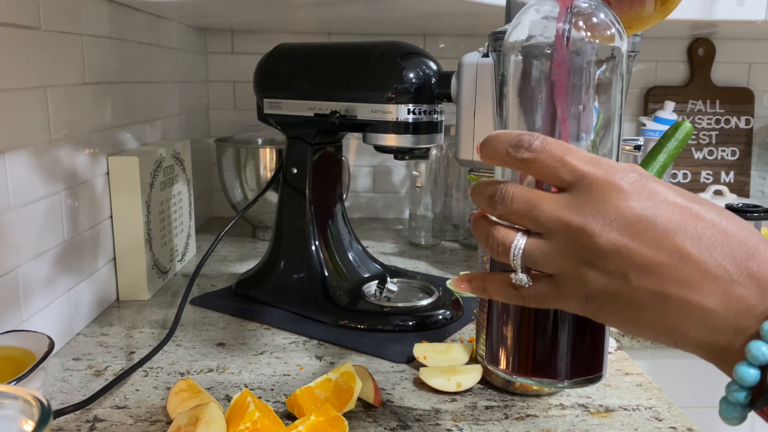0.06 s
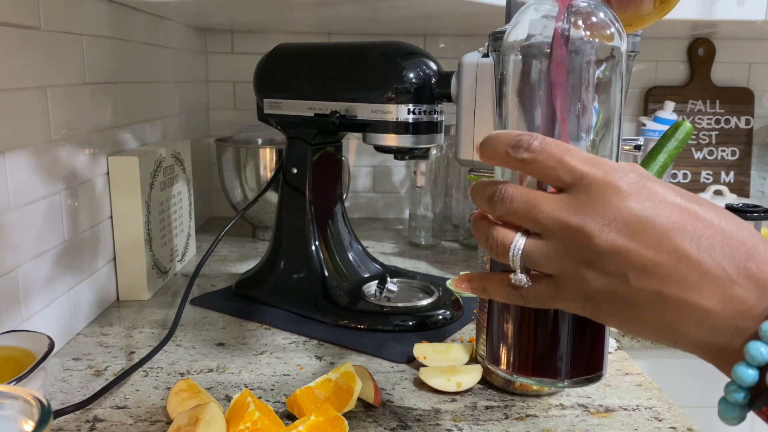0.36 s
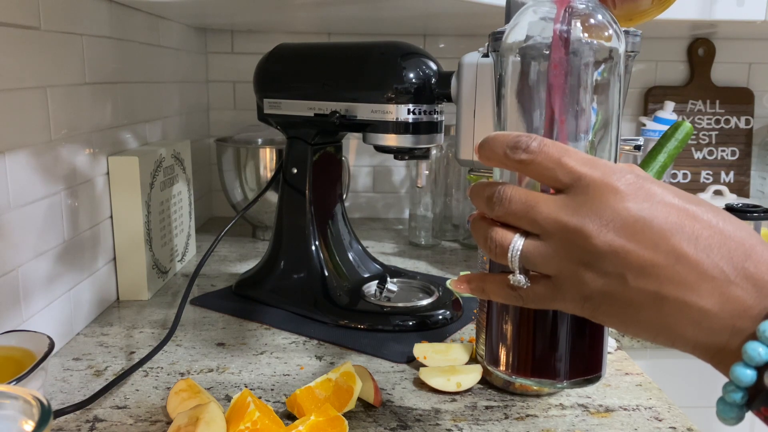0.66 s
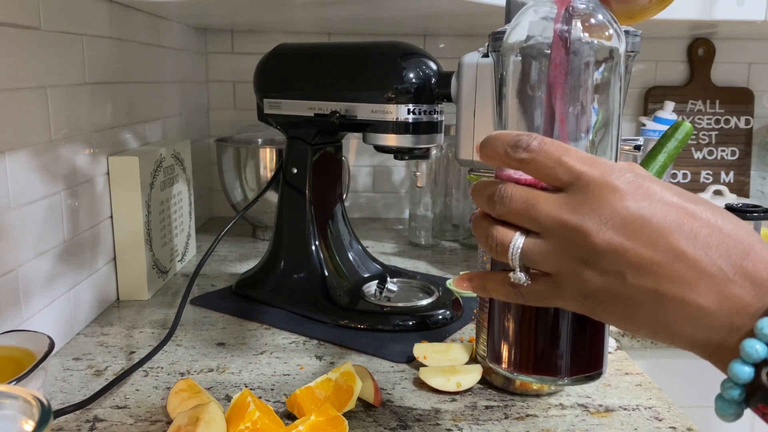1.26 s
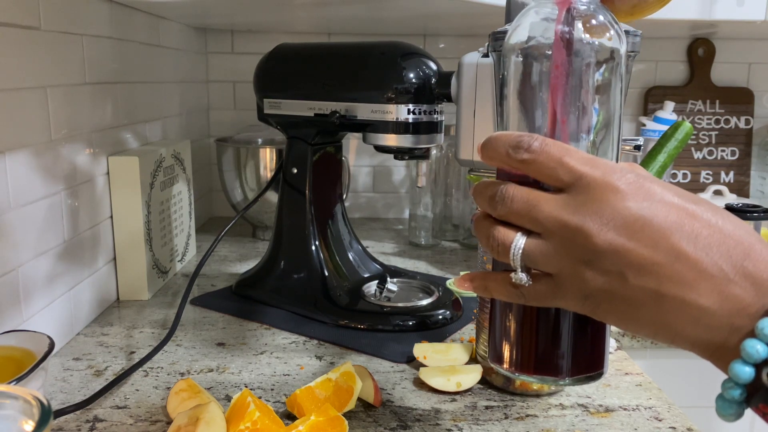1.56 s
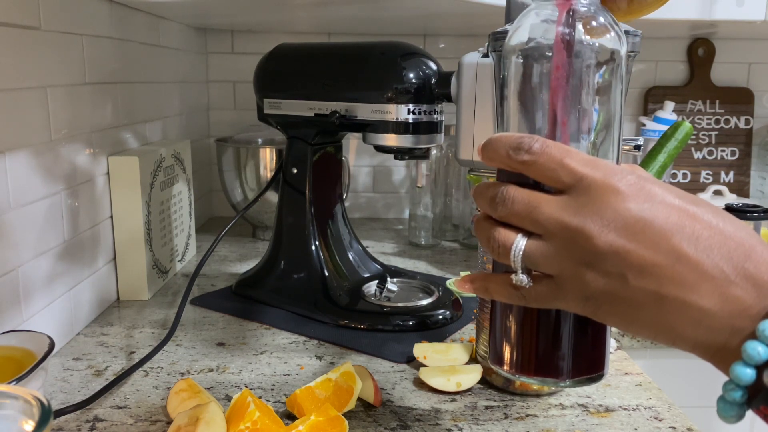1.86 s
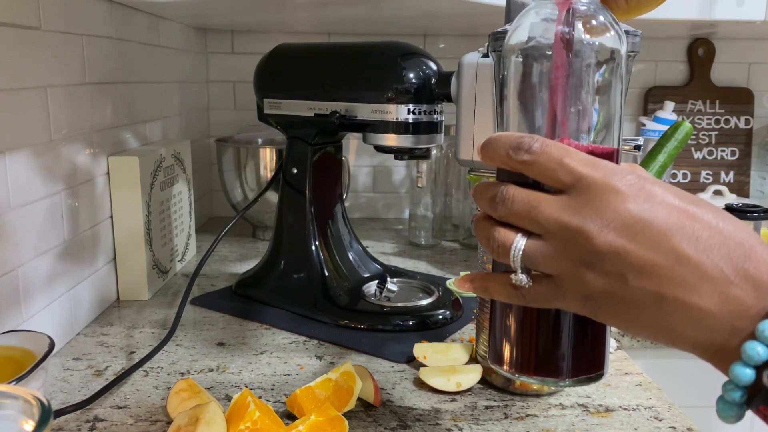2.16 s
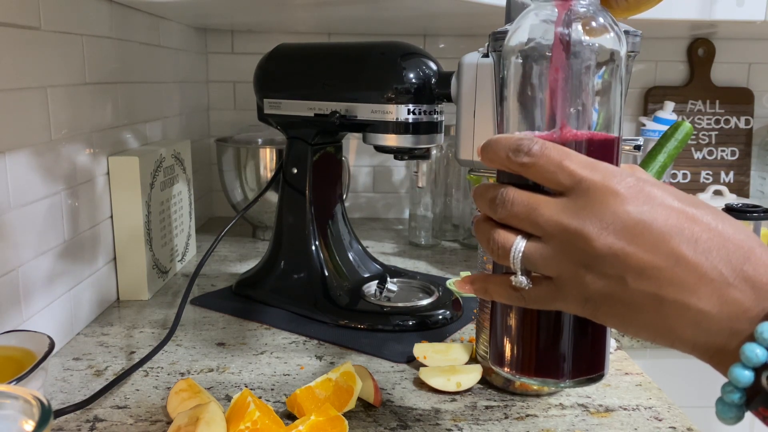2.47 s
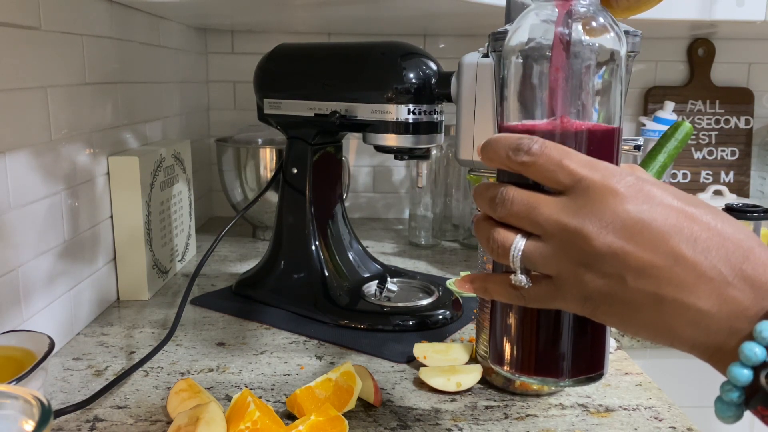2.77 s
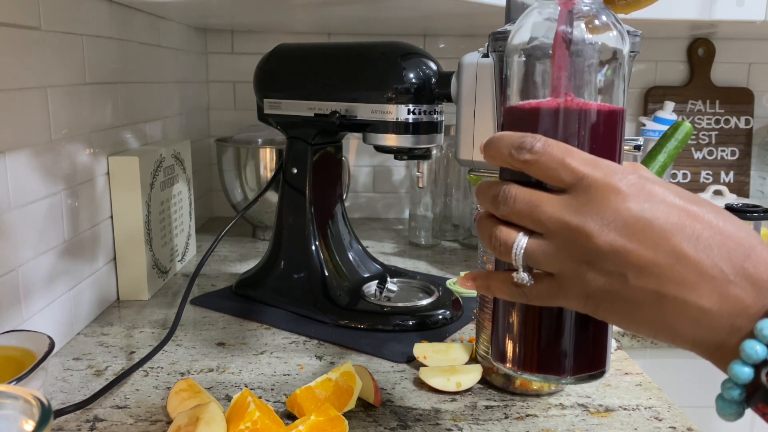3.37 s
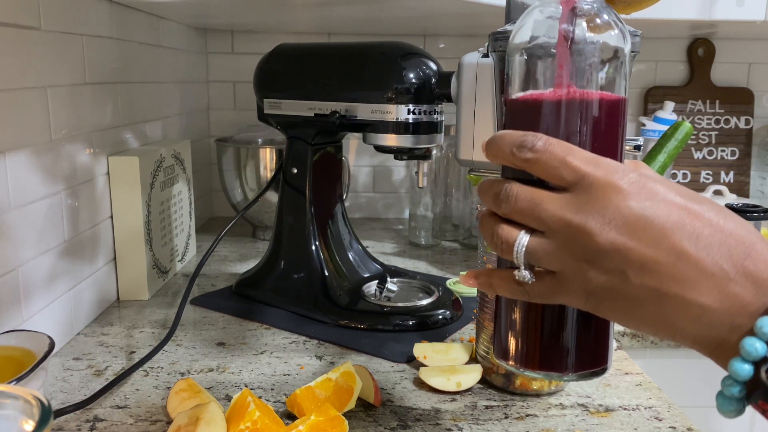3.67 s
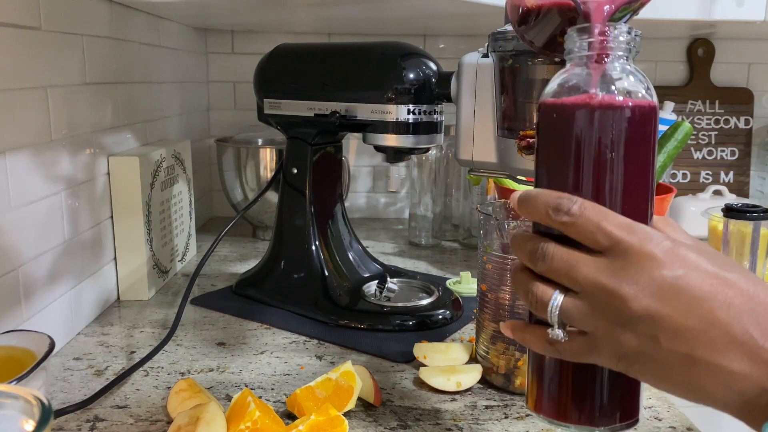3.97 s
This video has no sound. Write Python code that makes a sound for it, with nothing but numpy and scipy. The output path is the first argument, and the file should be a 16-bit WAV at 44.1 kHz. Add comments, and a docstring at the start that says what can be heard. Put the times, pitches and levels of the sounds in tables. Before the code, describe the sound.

A thin stream of juice fills a glass bottle with foamy hiss and a brief knock.

```python
'''A glass bottle on a kitchen counter, the microphone close in front, the sound nearly mono.
From the start a thin stream of juice runs in: foam fizzes and, for the first second or so, larger
bubbles burst. As the bottle fills, the air above the juice rings higher and fainter, and low glugs and
dull bumps come in. Halfway the bottle is knocked once; a sharp tick on the left and a soft bump follow.
The pour runs on and eases a little towards the end.'''
import sys
import numpy as np
from scipy import signal
from scipy.fft import rfft, irfft
from scipy.io import wavfile

SR = 44100
rng = np.random.default_rng(int(sys.argv[2]) if len(sys.argv) > 2 else 0)


def log_audio(samples):
    """Write samples as a 16-bit WAV file to the path given in sys.argv[1]."""
    # one column per channel
    frames = np.atleast_2d(samples).T
    # limit to full scale, then quantise
    limited = np.clip(frames, -1, 1)
    pcm = np.round(limited * 32767).astype(np.int16)
    wavfile.write(sys.argv[1], SR, pcm)


N = 176400

# Levels in the tables are relative; t60 is the time a ring takes to fall by 60 dB.
# spectrum of a faint low noise: f/Hz, level/dB
LOW_NOISE_SPECTRUM = [(20, -9), (55, 3), (150, 0.5), (400, -1.5), (700, -4), (900, -17), (1200, -51),
                      (15000, -46)]
# dull bumps: t/s, level/dB, starting f/Hz
BUMPS = [(1.622, -45, 900), (1.989, -52, 428), (2.391, -43, 650)]
# two low modes of the knocked bottle: f/Hz, level/dB, t60/s
BOTTLE_MODES = [(254, 1, .135), (224, -11, .12)]
# brief higher modes of its glass: f/Hz, level/dB, t60/s
GLASS_MODES = [(965, -24, .05), (1215, -14.5, .025)]
# strength of the churning under the stream: t/s, level/dB
CHURN_LEVEL = [(0, -63), (.3, -69.5), (.5, -64.5), (.85, -63.5), (1.1, -68.5), (1.6, -63), (1.75, -71.5),
               (1.95, -63.5), (2.25, -70.5), (2.45, -68), (3, -71.5), (4, -73)]
# spectrum of the churning: f/Hz, level/dB
CHURN_SPECTRUM = [(20, -23), (38, -14), (56, 1.5), (75, 0.5), (110, 0), (190, -4), (300, -3), (600, -14),
                  (1500, -31)]
# air pockets under the stream: t/s, level/dB, f/Hz
GLUGS = [(1.245, -50, 60), (1.372, -54, 169), (1.467, -46, 302), (1.542, -49, 307), (1.589, -52, 105),
         (1.912, -45, 295), (1.965, -56, 62), (2.728, -51, 141), (2.88, -56, 55), (3.244, -56, 135),
         (3.54, -57, 85)]
# strength of the pour: t/s, level/dB
FLOW = [(0, -47.5), (.25, -48), (.9, -48), (1.45, -48.5), (1.9, -47.5), (2.4, -47), (2.9, -48),
        (3.4, -49.5), (3.99, -51.5)]
# spectrum of the splash's soft body: f/Hz, level/dB
SPLASH_SPECTRUM = [(40, -18), (140, 0), (250, -3), (450, .5), (800, -.5), (1100, -7), (3000, -35)]
# air above the juice: t/s, lowest mode's f/Hz, its width/Hz, its level/dB, upper modes' level/dB
AIR_COLUMN = [(0, 1320, 300, 9.8, 1.3), (.35, 1370, 330, 8.2, 0), (.6, 1600, 600, 6, -1.5),
              (.9, 1820, 540, 7, -1), (1.25, 2000, 620, 6.8, -2), (1.7, 2270, 950, 4.8, -6),
              (2.3, 2330, 1700, 1.7, -14), (3.2, 1880, 2100, 2, -25), (4, 1760, 2100, 1, -21)]
# upper modes of that air at the start: f/Hz, width/Hz, level/dB
UPPER_AIR_MODES = [(3400, 420, 3.2), (4720, 340, -11)]
# crisp snaps in the foam: t/s, level/dB
SNAPS = [(.0629, -20), (.1313, -28), (1.536, -34), (1.7155, -30), (1.9842, -35), (2.3521, -31),
         (2.5329, -32), (3.359, -33), (3.749, -33)]
# larger bubbles bursting: t/s, level/dB
LARGE_POPS = [(.0129, -36), (.0158, -30), (.022, -43), (.0383, -22.5), (.063, -33), (.0896, -33),
              (.1123, -33), (.1206, -31), (.1316, -39), (.1586, -35), (.1654, -36), (.1783, -30.5),
              (.3941, -26.5), (.4132, -28), (.4513, -35), (.4967, -31.5), (.5234, -29.5), (.5433, -35),
              (.656, -39), (.7705, -38), (.8231, -24.5), (.8484, -30), (.8937, -28.5), (.956, -31),
              (1.016, -36), (1.2251, -29.5), (1.2576, -28), (1.306, -40), (1.317, -35.5)]
# modes of the juice shaken by a pop: f/Hz, level/dB, t60/s
SLOSH_MODES = [(75, -49, .09), (138, -21.5, 0.06), (311, -28.5, 0.057)]
# spectrum of the fizzing foam: f/Hz, level/dB
FIZZ_SPECTRUM = [(200, -13), (500, -6.5), (800, -5), (1250, .6), (1700, -0.5), (2800, -0.2), (3900, -1.2),
                 (4500, -1.6), (5300, -0.5), (6500, -2.06), (9000, -2.5), (11800, -3.5), (13200, -8),
                 (15600, -8.3)]


def from_db(db):
    """Decibels to gain."""
    return 10 ** (np.asarray(db) / 20)


def rms_one(x):
    """Scale to unit rms."""
    return x / np.sqrt(np.mean(x ** 2) + 1e-20)


def clock():
    """Seconds at every sample."""
    return np.arange(N) / SR


def in_time(rows):
    """The columns after t/s, interpolated at every sample."""
    times, *columns = np.transpose(rows)
    return [np.interp(clock(), times, column) for column in columns]


def colour(x, spectrum):
    """Equalise by a curve of f/Hz, level/dB."""
    hz, db = np.transpose(spectrum)
    bin_hz = np.maximum(np.arange(N // 2 + 1) * SR / N, 1)
    return irfft(rfft(x) * from_db(np.interp(np.log(bin_hz), np.log(hz), db)), N)


def butter_pass(x, hz, kind):
    """Second-order low- or high-pass."""
    return signal.sosfilt(signal.butter(2, hz, kind, fs=SR, output="sos"), x + 1e-18)


def drift(rate_hz):
    """A random wander around the given rate, at unit rms."""
    bin_hz = np.arange(N // 2 + 1) * SR / N
    band = bin_hz / (rate_hz ** 2 + bin_hz ** 2) / (1 + (bin_hz / rate_hz) ** 2)
    return rms_one(irfft(rfft(rng.standard_normal(N)) * band, N))


def clicks(rows):
    """One impulse per row of t/s, level/dB."""
    out = np.zeros(N)
    for at_s, db in rows:
        out[int(at_s * SR)] += from_db(db)
    return out


def ring(x, modes):
    """Decaying sines set off by x, one per row of f/Hz, level/dB, t60/s."""
    out = 0
    for hz, db, t60 in modes:
        radius = np.exp(-np.log(1000) / (t60 * SR))
        angle = 2 * np.pi * hz / SR
        feedback = [1, -2 * radius * np.cos(angle), radius ** 2]
        out = out + from_db(db) * signal.lfilter([0, np.sin(angle)], feedback, x + 1e-18)
    return out


def resonate(x, hz, width_hz, block=256):
    """A moving resonance with gain 1 at its peak."""
    out, state = np.zeros(N), np.zeros(2)
    for i in range(0, N, block):
        radius = np.exp(-np.pi * width_hz[i] / SR)
        forward = (1 - radius ** 2) / 2 * np.array([1, 0, -1])
        feedback = [1, -2 * radius * np.cos(2 * np.pi * hz[i] / SR), radius ** 2]
        out[i:i + block], state = signal.lfilter(forward, feedback, x[i:i + block], zi=state)
    return out


def low_stereo_noise(start_db=-76, fade_db_per_s=1):
    """A faint low noise below about 900 Hz, in opposite phase left and right."""
    noise = rms_one(colour(rng.standard_normal(N), LOW_NOISE_SPECTRUM))
    side = noise * from_db(start_db - fade_db_per_s * clock())
    return np.array([side, -side])


def kitchen_reverb(x, level_db=-28, t60_s=.25, dull_hz=500):
    """The kitchen returns a short dull tail, different on each side of the microphone."""
    t = np.arange(SR // 2) / SR
    tails = butter_pass(rng.standard_normal((2, len(t))), dull_hz, "low")
    tails *= np.exp(-np.log(1000) * t / t60_s)
    tails /= np.sqrt(np.sum(tails[0] ** 2))
    return from_db(level_db) * signal.fftconvolve(x[None], tails, axes=1)[:, :N]


def bump(at_s, db, start_hz, end_hz=60, fall_s=.004, decay_s=.013):
    """A dull bump that drops quickly in pitch."""
    age = np.maximum(clock() - at_s, 0)
    hz = (end_hz + (start_hz - end_hz) * np.exp(-age / fall_s)) * (age > 0)
    return from_db(db) * np.exp(-(age / decay_s) ** 2) * np.sin(2 * np.pi * np.cumsum(hz) / SR)


def tick(at_s=2.19457, db=-1.4):
    """One dry, sharp tick in the left channel only."""
    return np.array([clicks([(at_s, db)]), np.zeros(N)])


def knock(at_s=2.1132, db=-29, contact_s=.0089, right_lag_s=.00031):
    """A blow clinks on the glass; two low bottle modes swell and beat, reaching the left side first."""
    blow = clicks([(at_s, db)])
    swell = 1 - np.exp(-(np.maximum(clock() - at_s, 0) / contact_s) ** 2)
    left = swell * (ring(blow, BOTTLE_MODES[:1]) - ring(blow, BOTTLE_MODES[1:]))
    right = np.interp(clock() - right_lag_s, clock(), left)
    return ring(blow, GLASS_MODES) + np.array([left, right])


def churn(gain_db=2, lumps_db=2):
    """Lumpy low rumble where the stream plunges in."""
    level_db, = in_time(CHURN_LEVEL)
    lumpy_noise = rng.standard_normal(N) * from_db(lumps_db * drift(rate_hz=22))
    return from_db(gain_db + level_db) * rms_one(colour(lumpy_noise, CHURN_SPECTRUM))


def glugs(cycles=9):
    """Large pockets of air under the stream ring for a few cycles."""
    return sum(ring(clicks([(at_s, db)]), [(hz, 0, cycles / hz)]) for at_s, db, hz in GLUGS)


def crackle(per_s=14000, spread_db=6):
    """Thousands of tiny bubble collapses a second, of uneven size, at unit rms."""
    sizes = from_db(spread_db * np.clip(rng.standard_normal(N), -3, 3))
    signs = rng.choice([-1, 1], N)
    collapses = rng.random(N) < per_s / SR
    return rms_one(sizes * signs * collapses)


def splash(gain_db=-22, rise_db_per_s=2.4):
    """The soft body of the splash comes out more as the surface climbs towards the bottle's mouth."""
    flow_db, = in_time(FLOW)
    body = rms_one(colour(crackle(), SPLASH_SPECTRUM))
    return from_db(gain_db + flow_db + rise_db_per_s * clock()) * body


def air_column(x, upper_rise_hz_per_s=120, upper_widen_hz_per_s=220):
    """The air above the juice rings higher as it shrinks; foam damps it, and late on its note sags."""
    lowest_hz, lowest_width_hz, lowest_db, upper_db = in_time(AIR_COLUMN)
    rise_hz = upper_rise_hz_per_s * clock()
    widening_hz = upper_widen_hz_per_s * clock()
    out = from_db(lowest_db) * resonate(x, lowest_hz, lowest_width_hz)
    for hz, width_hz, db in UPPER_AIR_MODES:
        out += from_db(upper_db + db) * resonate(x, hz + rise_hz, width_hz + widening_hz)
    return out


def snaps():
    """Single crisp snaps in the foam."""
    return butter_pass(clicks(SNAPS), hz=1500, kind="high")


def small_bursts(start_per_s=40, thinning_s=.91, db=-47, spread_db=2):
    """Impulses of small bubbles bursting, thinning out as foam covers the juice."""
    bursts = rng.random(N) < start_per_s / SR * np.exp(-clock() / thinning_s)
    return bursts * from_db(db + spread_db * rng.uniform(-.88, 1, N))


def pops(swell_s=.00036, decay_s=.0002, gain_db=3, air_db=-14):
    """Each bubble sucks in briefly and bursts in one pulse, shaking the juice and the air above it."""
    bursts = clicks(LARGE_POPS) + small_bursts()
    t = np.arange(-SR // 100, SR // 100 + 1) / SR
    suction = -decay_s / swell_s * np.exp(-abs(t) / swell_s)
    pulse = np.where(t < 0, suction, np.exp(-abs(t) / decay_s))
    pulses = signal.fftconvolve(bursts, pulse, "same")
    direct = from_db(gain_db) * butter_pass(pulses, hz=2300, kind="low")
    slosh = ring(bursts, SLOSH_MODES)
    return butter_pass(direct + slosh, hz=50, kind="high") + from_db(air_db) * air_column(direct)


def fizz(gain_db=5, flutter_db=.49, air_swell_db=.8):
    """Foam crackles with the flow and reaches the microphone directly and through the air column."""
    flow_db, = in_time(FLOW)
    inside = crackle() * from_db(air_swell_db * drift(rate_hz=11))
    level_db = gain_db + flow_db + flutter_db * drift(rate_hz=25)
    direct = colour(crackle(), FIZZ_SPECTRUM)
    return from_db(level_db) * (direct + air_column(inside))


def scene():
    """The pour sits close, dry and centred; only the knock sets off the kitchen's tail."""
    pour = fizz() + splash() + churn() + glugs() + pops() + snaps()
    knocked = knock()
    bumps = sum(bump(*row) for row in BUMPS)
    return pour + knocked + kitchen_reverb(knocked[0]) + bumps + tick() + low_stereo_noise()


def record(dry, bass_cut_hz=46, top_cut_hz=16000):
    """The microphone rolls off the deepest bass and cuts the top steeply, without smearing ticks."""
    low_pass = signal.firwin(101, top_cut_hz, fs=SR)
    return signal.fftconvolve(butter_pass(dry, bass_cut_hz, "high"), low_pass[None], "same", axes=1)


dry = scene()
out = record(dry)
log_audio(out)
```